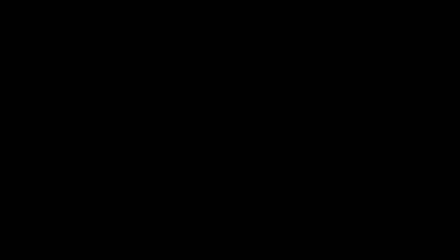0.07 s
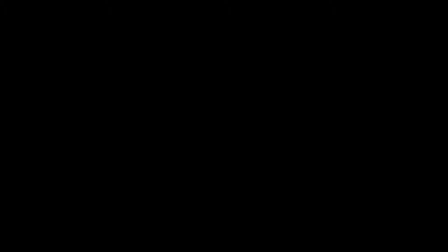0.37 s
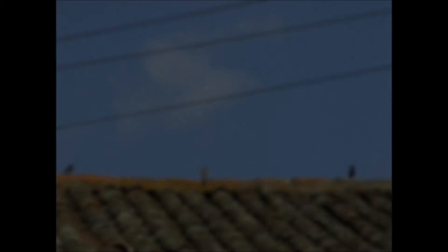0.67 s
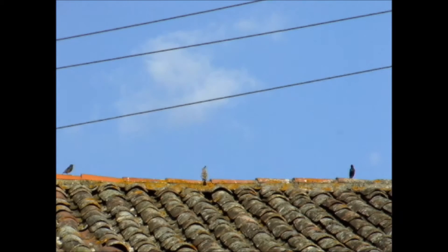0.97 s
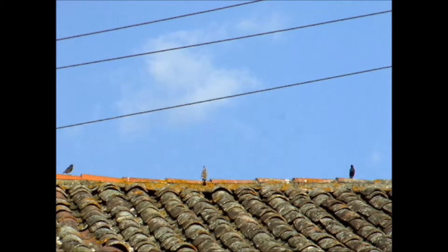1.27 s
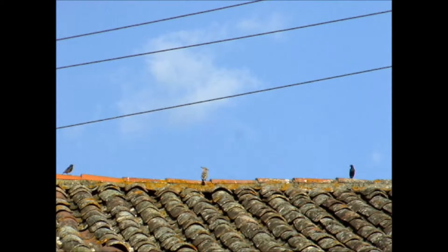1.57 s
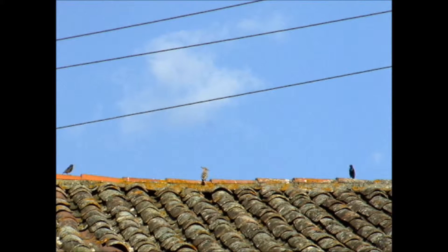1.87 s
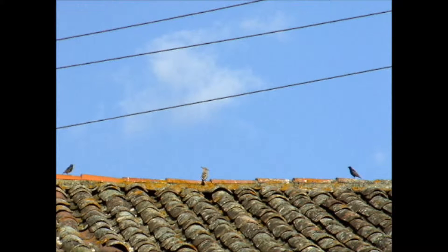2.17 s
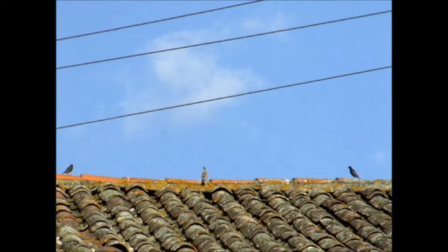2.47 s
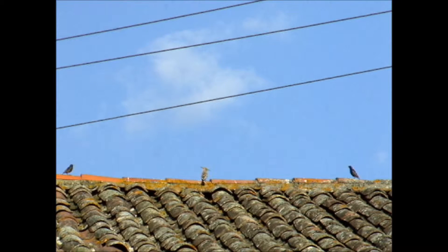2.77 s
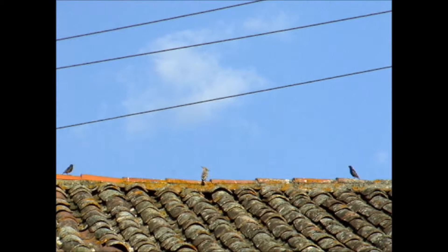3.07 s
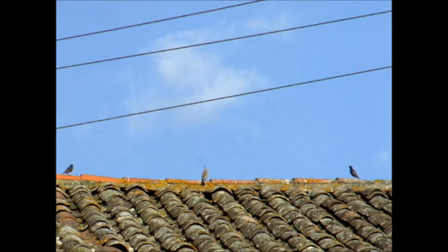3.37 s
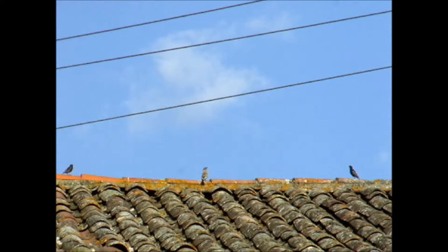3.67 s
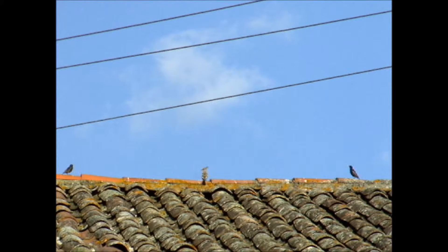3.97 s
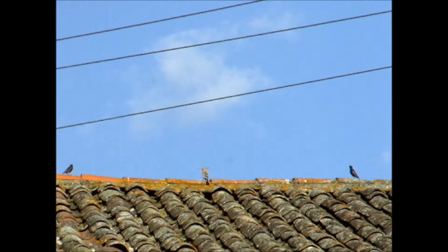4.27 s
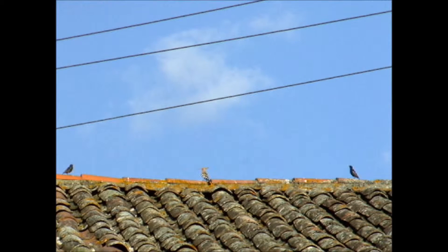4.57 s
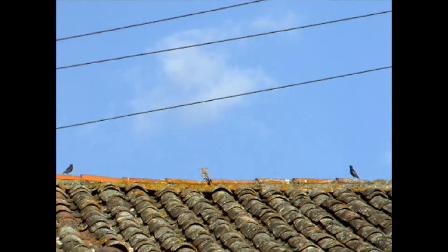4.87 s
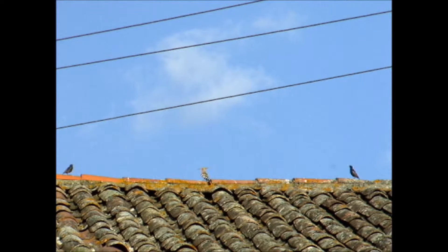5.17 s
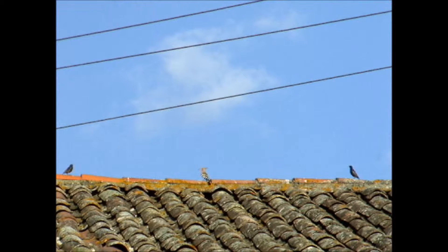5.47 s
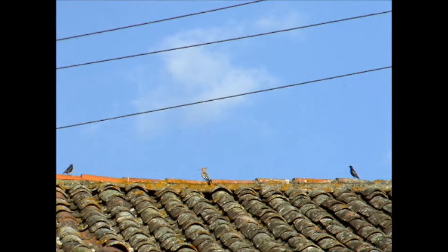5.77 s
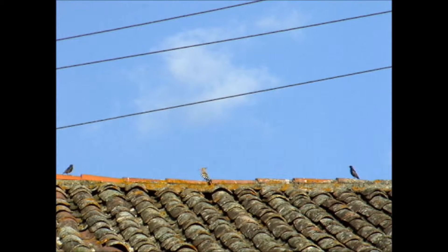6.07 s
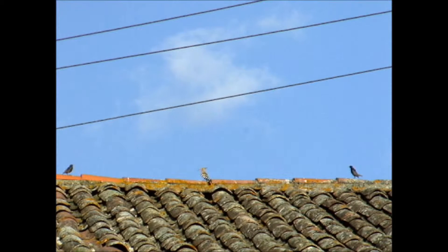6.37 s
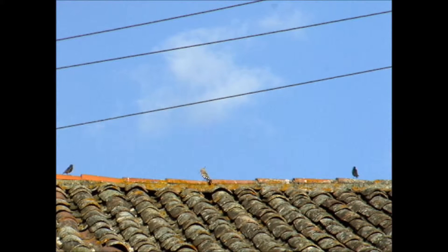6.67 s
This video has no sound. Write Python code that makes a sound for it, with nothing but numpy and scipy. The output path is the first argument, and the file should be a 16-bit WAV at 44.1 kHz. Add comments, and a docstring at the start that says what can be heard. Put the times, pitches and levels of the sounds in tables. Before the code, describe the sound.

A small pop at 0.1 seconds opens a steady, grainy hiss with a thin high whine, heard outdoors through a small camera microphone. A tiny metallic tink sounds close by at 0.3 seconds, followed by faint sparrow chirps. A distant hoopoe gives a soft, low double hoot at about 1.3 seconds and another at 3.4. Between them, a starling makes two thin rising whistles around 2 seconds, and a few high chirps follow at 2.7. The birds are all faint and echo slightly off house walls. Far traffic swells gently between 4 and 5 seconds. From about 5.5 seconds, faint piping and twittering return. A close tick comes at 6 seconds and a sharper double tick at 6.3, the loudest sound. At about 6.7 seconds a short whistle sounds as a distant rooster starts to crow, cut off almost at once.

```python
"""On a tiled village roof a hoopoe gives two soft double hoots; sparrows, a starling and a far songbird
call around it in gliding, nearly pure tones, and house walls reflect them. Something close by tinks and
ticks as contacts excite its modes. Distant traffic swells; a far cockerel starts to crow at the end.
A small camera quantises it all to 8 bits: a pop as it starts, then grainy hiss and a thin whine
from its picture scan."""
import sys
import numpy as np
from scipy import signal
from scipy.fft import rfft, irfft
from scipy.io import wavfile

SR = 44100
rng = np.random.default_rng(int(sys.argv[2]) if len(sys.argv) > 2 else 0)


def transcribe(u):
    """Save the signal u as a 16-bit wav file named by the first command-line argument.

    u: samples, shape (n,) or (channels, n), limited to [-1, 1]; the rate is SR.
    q: integer samples, one column per channel.
    """
    v = np.clip(np.atleast_2d(u).T, -1, 1)
    q = np.round(v * 32767).astype(np.int16)
    wavfile.write(sys.argv[1], SR, q)


N = 300762
T = np.arange(N) / SR


def undb(db):
    """The decibel scale: 20 dB is a tenfold amplitude."""
    return 10 ** (np.asarray(db) / 20)


def add(track, start, sound):
    """Superposition: a sound adds to the track from start, in seconds."""
    i = int(start * SR)
    track[i:i + len(sound)] += sound[:N - i]


def wander(rate, size):
    """Random modulation: rate values a second, joined by lines, with a spread near 1."""
    points = rng.standard_normal(1024)
    return 1.2 * np.interp(np.arange(size) / SR * rate, np.arange(len(points)), points)


def noise(spectrum):
    """Spectral shaping: white noise filtered by (f/Hz, level/dB) points, at rms 1."""
    hz, db = np.transpose(spectrum)
    f = np.maximum(np.fft.rfftfreq(N, 1 / SR), 1)
    gain = undb(np.interp(np.log(f), np.log(hz), db))
    shaped = irfft(rfft(rng.standard_normal(N)) * gain, N)
    return shaped / shaped.std()


START_S, POP_S = .103, .00203
SAMPLE_HZ, FULL_SCALE_STEPS = 16000, 128
LINE_HZ, FRAME_LINES = 15734, 525
# Reconstruction filter, closing near half the sampling rate: f/Hz, gain/dB
SMOOTHING = [(7200, 0), (7500, -1), (7700, -4), (7800, -7), (7900, -10.5), (8000, -17), (8140, -25),
             (8260, -26), (8330, -60), (9000, -90)]


def converter(sound, leak_steps, offset_steps):
    """Quantisation: coarse 8-bit steps turn faint sound into hiss; crosstalk from the scan whines."""
    t = np.arange(round(N * SAMPLE_HZ / SR)) / SAMPLE_HZ
    # the leak flips every line and restarts each frame, so the whine flutters
    leak = leak_steps * np.cos(np.pi * (t * LINE_HZ % FRAME_LINES))
    steps = np.floor(signal.resample(sound, len(t)) * FULL_SCALE_STEPS + leak + offset_steps)
    waking = (t > START_S / 2) & (t < START_S + POP_S)  # held at its lowest value: the pop
    spectrum = np.fft.fft(np.where(waking, -1, steps / FULL_SCALE_STEPS))
    bins = np.arange(N // 2 + 1)
    images = spectrum[bins % len(t)]  # a sampled spectrum repeats
    smoothing = undb(np.interp(bins * SR / N, *np.transpose(SMOOTHING)))
    return irfft(images * smoothing, N) * N / len(t)


# Mains hum partials: f/Hz, level/dB
HUM = [(50, -60), (200, -70.5)]


def mains_hum():
    """Harmonics: steady sinusoids at multiples of the mains frequency."""
    return sum(np.sqrt(2) * undb(db) * np.sin(2 * np.pi * (hz * T + rng.random())) for hz, db in HUM)


# Outdoor air and amplifier noise: f/Hz, relative spectral density/dB
AIR_SPECTRUM = [(20, -2), (38, 0), (52, 6), (75, 3.5), (130, -1), (300, 0.5), (450, -1), (800, -3),
                (1500, -5.5), (3000, -9), (7800, -12), (8600, -48.5)]


def air(level_db):
    """Stationary noise: air and amplifier keep a constant spectrum and level."""
    return noise(AIR_SPECTRUM) * undb(level_db)


# Swell of the traffic: t/s, level/dB
TRAFFIC_SWELL = [(.1, -61.5), (.85, -62), (1.3, -72), (3.8, -68), (4.4, -59.5), (5.3, -62), (5.8, -67),
                 (6.82, -68.5)]
# Its rumble: f/Hz, relative spectral density/dB
TRAFFIC_SPECTRUM = [(60, -8), (240, -6), (350, -0.5), (480, -4), (700, -2), (1200, -8), (3000, -25)]


def traffic():
    """Amplitude modulation: the rumble of distant traffic slowly swells and ebbs."""
    return noise(TRAFFIC_SPECTRUM) * undb(np.interp(T, *np.transpose(TRAFFIC_SWELL)))


# Contacts of a small metal part chattering once: t/s, level/dB
TINKS = [(.3278, -40), (.3303, -39.5), (.333, -39)]
# Its modes: f/Hz, relative level/dB, T60/s
TINK_MODES = [(727, -12, .06), (2290, -12.5, .045), (3020, -7.5, .02), (5610, 0, .025), (6650, -4, 0.04),
              (7200, -9, .025), (7440, -5, 0.027), (7800, -2.5, .02)]


def tink(crack_db, crack_t60):
    """Damped free vibration: each contact cracks, and the metal's modes decay at their own rates."""
    out, t = np.zeros(N), T[:SR // 8]
    for start, level_db in TINKS:
        ring = sum(undb(db - 60 * t / t60) * np.sin(2 * np.pi * (hz * t + rng.random()))
                   for hz, db, t60 in TINK_MODES)
        crack = undb(crack_db - 60 * t / crack_t60) * rng.standard_normal(len(t))
        add(out, start, (ring + crack) * undb(level_db))
    return out


def slur(length, hz, lead_octaves, end_octaves):
    """Glide: a parabola in log frequency, through hz midway, its ends offset by the given octaves."""
    bend = np.polyfit([-1, 0, 1], [lead_octaves, 0, end_octaves], 2)
    return hz * 2 ** np.polyval(bend, np.linspace(-1, 1, int(length * SR)))


def whistle(path_hz, db, waver, flutter_db, swell):
    """Frequency modulation: a tone swells and fades; jitter grows with its range, so wide slurs rasp."""
    size = len(path_hz)
    hz = path_hz + waver * np.ptp(path_hz) * wander(700, size)
    envelope = np.abs(np.sin(np.linspace(0, np.pi, size))) ** swell
    gain = undb(db + flutter_db * wander(150, size))
    return np.sqrt(2) * envelope * gain * np.sin(2 * np.pi * np.cumsum(hz) / SR)


def notes(table, lead_octaves, end_octaves, **voice):
    """Transposition: one glide shape, moved to each note's frequency and duration."""
    out = np.zeros(N)
    for start, length, hz, db in table:
        add(out, start, whistle(slur(length, hz, lead_octaves, end_octaves), db, **voice))
    return out


def twitter(from_s, to_s, low_hz, high_hz, db, count, length_s=.02):
    """Uniform scatter: rows for farther sparrows' chirps, at random times and frequencies."""
    return [(from_s + when * (to_s - from_s), length_s, low_hz + height * (high_hz - low_hz), db)
            for when, height in rng.random((count, 2))]


# Sparrows' chirps: t/s, duration/s, f/Hz, relative level/dB
CHIRPS = [(.582, 0.026, 3300, -57.5), (.793, 0.039, 4084, -54), (.93, 0.037, 4186, -52.5),
          (2.640, .014, 5670, -51), (2.692, 0.016, 5500, -52.5), (2.738, 0.02, 5370, -52.5),
          (6.08, .024, 3650, -57.5), (6.138, 0.019, 2700, -56.5), (6.172, .022, 3020, -53.5),
          (6.214, .024, 3854, -55.5), (6.276, .028, 2450, -51.5), (6.308, .022, 3080, -53.5),
          (6.384, 0.035, 2380, -53.5), (6.424, .022, 2430, -54), (6.514, .026, 2340, -54.5),
          (6.546, .022, 2380, -53.5)]


def sparrows(upper_ratio, upper_db):
    """Biphonation: each falling chirp carries a weaker second voice above it."""
    faint = twitter(from_s=5.45, to_s=6.25, low_hz=3474, high_hz=5990, db=-57.5, count=6)
    faint += twitter(from_s=6.1, to_s=6.6, low_hz=2000, high_hz=3200, db=-61, count=9)
    trill = [(.828 + k * .0105, .009, 4040, -53.5) for k in range(5)]  # columns as in CHIRPS
    lower = CHIRPS + trill + faint
    upper = [(start, length, hz * upper_ratio, db + upper_db) for start, length, hz, db in lower]
    return notes(lower + upper, lead_octaves=.24, end_octaves=-.13, waver=.08, flutter_db=2, swell=.55)


# A far songbird's piping: t/s, duration/s, f/Hz, level/dB
PIPS = [(1.186, 0.022, 2317, -53.5), (5.76, 0.093, 2713, -59.5), (5.88, 0.081, 2690, -59),
        (6.044, 0.035, 4360, -58.5), (6.195, 0.031, 4350, -57.5)]


def songbird():
    """Tone bursts: short notes of almost constant frequency."""
    return notes(PIPS, lead_octaves=.02, end_octaves=-.0064, waver=.19, flutter_db=2, swell=.5)


# Double hoots: t/s, first note's duration/s, second's delay/s, level/dB, second's gain/dB
HOOTS = [(1.349, .091, .205, -47.8, 0.5), (3.408, .102, .21, -47.5, 2.5)]


def hoopoe(first_hz, second_hz, second_stretch, **voice):
    """Gliding pure tones: both hoots scoop up; the first sags again, the second stays high."""
    out = np.zeros(N)
    for start, length, delay, db, second_db in HOOTS:
        first = slur(length, first_hz, lead_octaves=-.15, end_octaves=-.082)
        second = slur(length * second_stretch, second_hz, lead_octaves=-.15, end_octaves=.012)
        add(out, start, whistle(first, db, **voice))
        add(out, start + delay, whistle(second, db + second_db, **voice))
    return out


# The starling's rising whistles: t/s, extra duration of the last slur/s, level/dB
WHISTLES = [(1.857, .022, -51.5), (1.998, 0, -50.5)]
# The slurs of each: delay/s, duration/s, starting f/Hz, time constant/s, relative level/dB
WHISTLE_SLURS = [(.008, .036, 3020, .055, 0), (.046, .025, 3793, .028, .8), (.08, .033, 3828, .012, 1.3)]


def starling(top_hz, **voice):
    """Exponential approach: each whistle climbs in three rough slurs towards one top frequency."""
    out = np.zeros(N)
    for start, hold, db in WHISTLES:
        for k, (delay, length, from_hz, rise_s, slur_db) in enumerate(WHISTLE_SLURS):
            is_last = k == len(WHISTLE_SLURS) - 1
            t = T[:int((length + hold * is_last) * SR)]
            hz = top_hz + (from_hz - top_hz) * np.exp(-t / rise_s)
            add(out, start + delay, whistle(hz, db + slur_db, **voice))
    return out


# Ticks close by: t/s, level/dB, T60/s, centre of the excitation f/Hz
TICKS = [(6.0094, -31, .007, 2900), (6.3277, -19.5, .0064, 3950), (6.345, -28, .004, 7600)]
# Modes of the ticking object: f/Hz, relative level/dB
TICK_MODES = [(2150, -5), (2400, 1), (2680, 2), (3230, -0.5), (3480, -7), (4450, -0.5), (4750, -1.5),
              (5300, -2), (6350, -1.5), (7650, -2)]


def ticks(crack_db, focus_octaves, push_s):
    """Impact excitation: each tick rings the modes over a crack, at its own brightness."""
    out, t = np.zeros(N), T[:SR // 8]
    hz, db = np.transpose(TICK_MODES)
    polarity = (-1) ** np.arange(len(hz))  # neighbours in antiphase: the tick takes an instant to bloom
    for start, level_db, t60, bright_hz in TICKS:
        weight = undb(db) / (1 + (np.log2(hz / bright_hz) / focus_octaves) ** 2)
        ring = (weight * polarity) @ np.sin(2 * np.pi * np.outer(hz, t))
        crack = undb(crack_db) * rng.standard_normal(len(t))
        envelope = np.minimum(t / push_s, 1) * undb(level_db - 60 * t / t60)
        add(out, start, (ring / ring.std() + crack) * envelope)
    return out


# Onset of the crow: t/s, f/Hz, level/dB, gain of overtones and breath/dB
CROW = [(6.68, 465, -60, -2), (6.725, 490, -54.5, -0.5), (6.752, 500, -50.5, -3),
        (6.772, 518, -40.5, -11.5), (6.787, 529, -41.5, -8), (6.8, 542, -48, 2), (6.82, 526, -47.5, 1.5)]
# Its overtones: harmonic number, relative level/dB
CROW_PARTIALS = [(2, -10), (3, -4), (4, -13.5), (5, -18.5)]
# Its husky breath: f/Hz, relative spectral density/dB
CROW_HUSK = [(400, -18.5), (900, -1.5), (1250, -9.5), (2300, -10.5), (4000, -31.5)]


def cockerel(jitter, rasp_db, fundamental_db, second_ratio, second_db, husk_db):
    """Harmonic series with jitter and shimmer: a hoarse call that starts hollow and turns brassy."""
    times, hz, db, bright_db = np.transpose(CROW)
    t = T[T >= times[0]]
    pitch = np.interp(t, times, hz) * (1 + jitter * wander(400, len(t)))
    phase = 2 * np.pi * np.cumsum(pitch) / SR
    fundamental = undb(fundamental_db) * np.sin(phase)
    second_voice = undb(second_db) * np.sin(second_ratio * phase)
    overtones = sum(undb(level) * np.sin(round(k) * phase) for k, level in CROW_PARTIALS)
    husk = undb(husk_db) * noise(CROW_HUSK)[:len(t)]
    voice = fundamental + second_voice + (overtones + husk) * undb(np.interp(t, times, bright_db))
    envelope = undb(np.interp(t, times, db) + rasp_db * wander(300, len(t)))
    out = np.zeros(N)
    add(out, times[0], np.sqrt(2) * voice * envelope)
    return out


def starling_arch(start_s, length_s, hz, db, upper_ratio, upper_db):
    """Biphonation: the two sides of the syrinx, tuned a little apart, whistle up and down together."""
    voices = [(start_s, length_s, hz, db), (start_s, length_s, hz * upper_ratio, db + upper_db)]
    return notes(voices, lead_octaves=-.24, end_octaves=-.2, waver=.076, flutter_db=2, swell=.35)


def village(sound, echo_s, echo_db, tail_db, t60):
    """Reflection and scattering: direct sound, one wall's echo and a diffuse tail from the roofs."""
    t = T[:SR]
    tail = rng.standard_normal(SR) * undb(-60 * t / t60) * (t > .008)
    response = tail / np.linalg.norm(tail) * undb(tail_db)
    response[0] += 1
    response[int(echo_s * SR)] += undb(echo_db)
    return signal.fftconvolve(sound, response)[:N]


def scene():
    """Superposition: reverberant birds, dry contacts close by, and a bed of hum, traffic and air."""
    hoots = hoopoe(first_hz=647, second_hz=655, second_stretch=1.08, waver=.056, flutter_db=0, swell=1.9)
    birds = village(hoots, echo_s=.031, echo_db=-15.5, tail_db=-15.5, t60=.55)
    whistles = starling(top_hz=4174, waver=.13, flutter_db=2.5, swell=.65)
    birds += village(whistles, echo_s=.088, echo_db=-12, tail_db=-2, t60=.5)
    arch = starling_arch(start_s=6.688, length_s=.1, hz=3950, db=-51.5, upper_ratio=1.075, upper_db=-6)
    birds += village(arch, echo_s=.021, echo_db=-12.5, tail_db=-8, t60=.36)
    chirps = sparrows(upper_ratio=1.17, upper_db=-9) * undb(-1.5)
    pips = songbird()
    birds += village(chirps, echo_s=.025, echo_db=-10.5, tail_db=-4, t60=.4)
    birds += village(pips, echo_s=.025, echo_db=-12, tail_db=-9.5, t60=.36)
    crow = cockerel(jitter=.028, rasp_db=2.5, fundamental_db=-6,
                    second_ratio=1.2, second_db=-11.5, husk_db=-9.5)
    birds += village(crow, echo_s=.03, echo_db=-15, tail_db=-8.5, t60=.43)
    contacts = tink(crack_db=-8, crack_t60=.025) + ticks(crack_db=-25, focus_octaves=.6, push_s=.00064)
    return (birds + contacts + mains_hum() + traffic() + air(level_db=-53.5))[None]


def record(dry):
    """Switch-on transient: the camera starts just before its converter wakes, so it opens with a pop."""
    sound = converter(dry[0], leak_steps=.52, offset_steps=.06) * (T >= START_S)
    lowpass = signal.ellip(8, .05, 60, 16400, fs=SR, output="sos")
    return signal.sosfiltfilt(lowpass, sound)[None]


dry = scene()
out = record(dry)
transcribe(out)
```